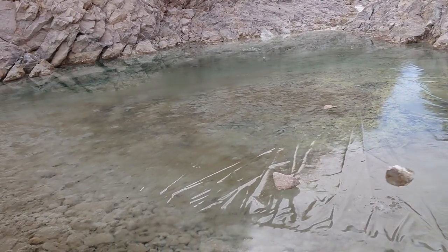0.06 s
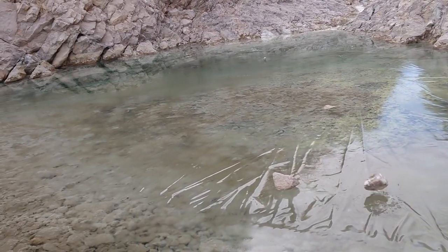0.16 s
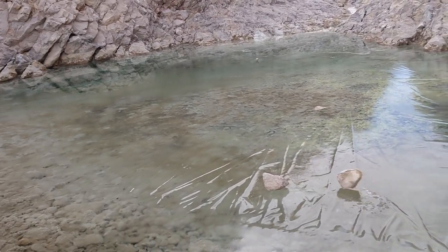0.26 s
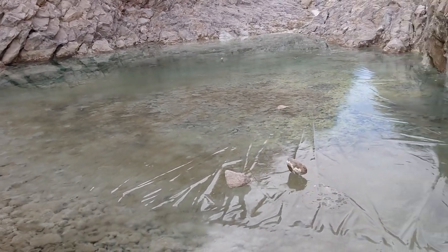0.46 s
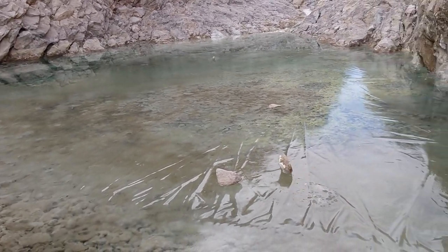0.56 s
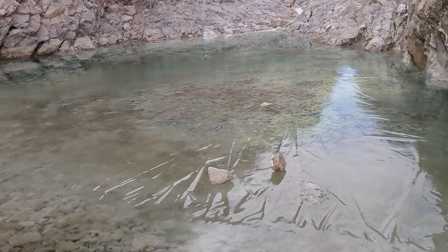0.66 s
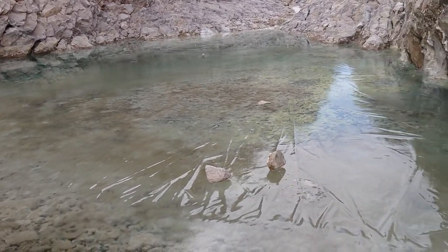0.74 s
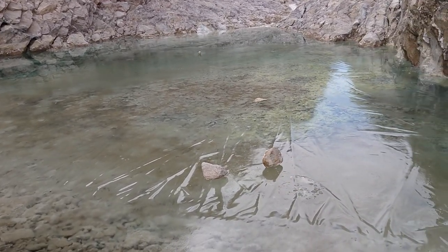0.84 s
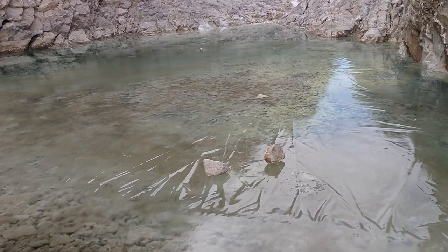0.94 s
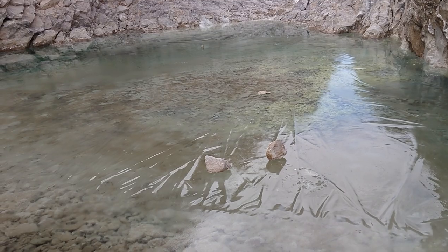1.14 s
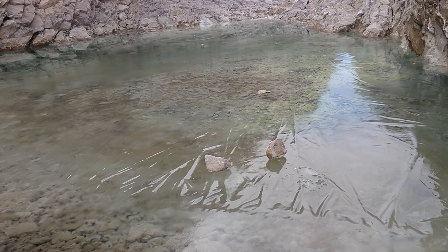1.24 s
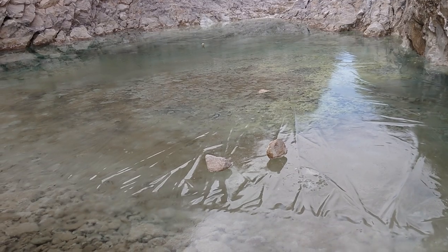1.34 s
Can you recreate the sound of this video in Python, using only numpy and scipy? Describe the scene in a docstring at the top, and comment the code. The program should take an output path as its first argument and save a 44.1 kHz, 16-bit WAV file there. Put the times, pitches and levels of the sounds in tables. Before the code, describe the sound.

A thrown stone strikes thin ice with a sharp crack, then tumbles on with weaker, slightly chirping knocks and a soft slide. Rocks around the pool return a short echo over faint outdoor wind.

```python
"""Faint wind swells, then a thrown stone cracks onto thin ice over a rock pool and tumbles on.
Each contact sends a quick falling chirp through the sheet, and the rock walls answer.
After a few duller knocks the stone slides softly; a few far peeps lie behind.
A small camera with two spaced microphones listens."""
import sys
import numpy as np
from scipy import signal
from scipy.fft import rfft, irfft, next_fast_len
from scipy.io import wavfile

SR = 44100
rng = np.random.default_rng(int(sys.argv[2]) if len(sys.argv) > 2 else 0)


def log_audio(samples):
    """Write samples as a 16-bit WAV file to the path given in sys.argv[1]."""
    # one column per channel
    frames = np.atleast_2d(samples).T
    # limit to full scale, then quantise
    limited = np.clip(frames, -1, 1)
    pcm = np.round(limited * 32767).astype(np.int16)
    wavfile.write(sys.argv[1], SR, pcm)


N = 61739
CRACK_S = 0.2257
THUD_LAG_MS, CHIRP_LAG_MS, ECHO_LAG_MS = 0.029, 0.24, 0.3403

# left-right likeness of ice and rock noise: freq_hz, correlation
POOL_LIKENESS = [(60, 0.78), (300, 1), (700, .55), (2000, 0.14), (6000, 0.49), (14000, 0.11)]


def amp(db):
    return 10 ** (np.asarray(db) / 20)


def unit_rms(x):
    return x / np.sqrt(np.mean(x ** 2) + 1e-20)


def along(points, hz):
    """Interpolate (freq_hz, value) points on a log axis."""
    freqs_hz, values = np.transpose(points)
    return np.interp(np.log(hz + 1), np.log(freqs_hz + 1), values)


def clock(start_s=0):
    return np.arange(N) / SR - start_s


def curves(rows):
    """Per-sample curve for each column after time_s."""
    times_s, *columns = np.transpose(rows)
    return [np.interp(clock(), times_s, column) for column in columns]


def fade(t, t60_s):
    return np.exp(-np.log(1000) * np.maximum(t, 0) / t60_s)


def rise(t, rise_s):
    return 1 - np.exp(-np.maximum(t, 0) / rise_s)


def swell(centre_s, sigma_s):
    return np.exp(-(clock(centre_s) / sigma_s) ** 2 / 2)


def filtered(x, response):
    """Apply a complex response(hz)."""
    size = next_fast_len(N + SR // 4)
    return irfft(rfft(x, size) * response(np.fft.rfftfreq(size, 1 / SR)), size)[..., :N]


def placed(x, lag_ms, pan_db):
    """Spaced microphones: left lags right by lag_ms; pan_db raises left and lowers right."""
    side = np.array([[1], [-1]])
    return amp(side * pan_db) * filtered(x, lambda hz: np.exp(-1j * np.pi * side * hz * lag_ms / 1000))


def noise(colour, likeness=POOL_LIKENESS):
    """Coloured stereo noise, rms 1."""
    def mid_side_gains(hz):
        angle = np.arccos(np.clip(along(likeness, hz), -1, 1)) / 2
        return amp(along(colour, hz)) * [np.cos(angle), np.sin(angle)]
    mid, side = filtered(rng.standard_normal((2, N)), mid_side_gains)
    return unit_rms(np.array([mid + side, mid - side]))


def damped_sines(tones, start_s, rise_s):
    t = np.maximum(clock(start_s), 0)
    sines = sum(amp(db) * np.sin(2 * np.pi * hz * t) * fade(t, t60_s) for hz, db, t60_s in tones)
    return rise(t, rise_s) * sines


def pulse(centre_s, hz):
    """One smooth pressure pulse, spectrum peaking at hz."""
    u = (np.pi * hz * clock(centre_s)) ** 2
    return (2 * u - 1) * np.exp(-np.minimum(u, 50))


def wind():
    """Soft moving air, a hiss that swells before the blow, low buffeting on the microphones."""
    air_levels = [(0, -64, -69), (.09, -63.5, -71), (.14, -63.5, -61), (.22, -61, -60), (.35, -72, -61),
                  (.55, -66, -69.5), (.75, -66.5, -75), (.92, -66.5, -76), (1.12, -63, -70.5),
                  (1.25, -64.5, -70.5), (1.4, -66.5, -77)]  # time_s, air_db, hiss_db
    buffet_levels = [(0, -83), (.11, -65.5), (.4, -94), (.68, -79.5), (.85, -74), (1.02, -73),
                     (1.11, -58.5), (1.17, -88), (1.4, -69.5)]  # time_s, level_db
    # spectra: freq_hz, density_db
    air_colour = [(25, 6), (60, 2), (170, -7.5), (260, -4), (420, 0), (620, -2), (850, 3), (1150, -1.5),
                  (1700, -0.5), (2800, -10.5), (5500, -37.5), (7900, -39), (10300, -13.5), (15500, -27.5)]
    hiss_colour = [(200, -20), (1000, -2.5), (2200, 1.5), (4000, 5), (5800, -0.5), (10500, -13.5),
                   (15500, -8)]
    buffet_colour = [(20, -18), (45, 5), (72, -3), (120, -30.5), (350, -23), (700, -28), (3000, -100)]
    likeness = [(40, 0.28), (200, 0.74), (600, 0.31), (2000, 0.18), (8000, 0.041)]  # left to right: freq_hz, correlation
    air_db, hiss_db = curves(air_levels)
    buffet_db, = curves(buffet_levels)
    air = placed(amp(air_db) * noise(air_colour, likeness), lag_ms=-0.45, pan_db=1.53)
    hiss = amp(hiss_db) * noise(hiss_colour, likeness)
    buffet = amp(buffet_db) * noise(buffet_colour, likeness)
    return air + hiss + buffet


def crack():
    """First blow: the stone grazes and bites; the ice splinters, thuds and rocks on the water."""
    # damped sines: pitch_hz, level_db, t60_s
    snap_modes = [(1480, -22, 0.017), (1810, -8, 0.021), (3390, -15, .016), (4340, -8, 0.011),
                  (5250, -27, 0.021)]
    sheet_modes = [(129.6, -35, 0.073), (163.5, -34.5, 0.041), (252, -35.5, 0.052), (394, -41, 0.071)]
    tail_tones = [(1502, -3, .3), (1710, 0, .25), (1905, -3, .25), (2450, -5, .25), (2600, -4, .18),
                  (2790, -6, .18), (2915, -5, .18), (3330, -2, .14), (5330, -6, .11), (5835, -7, .11)]  # faint narrow tones colouring the crack's echo
    # spectra: freq_hz, density_db
    splinter_colour = [(100, -14), (280, 0.5), (500, -17), (950, 2), (1400, -5), (1780, -2), (2200, -12),
                       (2600, 2), (3350, -3.5), (3900, -6.5), (5500, -3), (10000, -9), (12000, -7.5),
                       (15000, -7.5)]
    echo_colour = [(40, -15), (120, -3.5), (250, -8), (550, -6.5), (1000, -5.5), (1650, 2), (2700, -2),
                   (3800, -0.5), (5500, -6.5), (10500, -12), (15500, -16)]
    graze_lead_s, thud_lead_s, bite_delay_s = 0.0025, 0.0015, 0.00027
    splinter_rise_s, splinter_hold_s = 0.00032, 0.0045
    t = clock(CRACK_S)
    graze = amp(-41) * rise(t + graze_lead_s, splinter_rise_s)
    force = graze + amp(-28) * rise(t, splinter_rise_s)
    splinters = noise(splinter_colour) * force * fade(t - splinter_hold_s, t60_s=0.013)
    spike = amp(-12) * pulse(CRACK_S + bite_delay_s, hz=3800)
    split = amp(-24) * pulse(CRACK_S + bite_delay_s, hz=13000)
    snap = amp(-14) * damped_sines(snap_modes, CRACK_S, rise_s=0.0001) - spike - split
    tones = amp(-38.5) * damped_sines(tail_tones, CRACK_S, rise_s=0.001)
    thud = damped_sines(sheet_modes, CRACK_S - thud_lead_s, rise_s=0.001)
    heave = damped_sines([(60, -39, 0.16)], CRACK_S, rise_s=0.023)
    return (placed(splinters, ECHO_LAG_MS, pan_db=-0.8)
            + placed(snap, lag_ms=0.383, pan_db=2)
            + placed(tones, CHIRP_LAG_MS, pan_db=1.3)
            + placed(thud + heave, THUD_LAG_MS, pan_db=0)
            + basin(CRACK_S, echo_colour, tail_db=-35.5, scatter_db=-27, pan_db=-0.13))


def basin(start_s, colour, tail_db, scatter_db, pan_db):
    """The rocks return a blow: dense near scatter, then a tail whose treble dies first."""
    decay_times = [(100, 0.51), (500, 0.58), (1500, 0.34), (4000, 0.4), (12000, 0.4)]  # freq_hz, t60_s
    hz, t, spectrum = signal.stft(noise(colour), SR, nperseg=256)
    tail = amp(tail_db) * fade(t - start_s, along(decay_times, hz)[:, None])
    scatter = amp(scatter_db) * fade(t - start_s, t60_s=0.07) / 2
    echo = signal.istft(spectrum * (tail + scatter), SR, nperseg=256)[1][:, :N]
    return placed(echo * rise(clock(start_s), rise_s=0.001), ECHO_LAG_MS, pan_db)


def chirp(contact_s):
    """High bending waves outrun low ones in the sheet, so the pitch falls."""
    centre_hz, fall_s, lead_s, width_s = 1900, 0.0028, 0.0006, 0.00075
    t = np.clip(clock(contact_s - lead_s), -0.01, 0.01)
    cycles = centre_hz * fall_s * (1 - np.exp(-t / fall_s))
    return -np.cos(2 * np.pi * cycles) * np.exp(-(t / width_s) ** 2)


def knocks():
    """Each contact pushes the ice and sets off a chirp; the nearest wall repeats both."""
    contacts = [(0.2261, -27.5, 444, -20, -51.5), (0.3079, -47, 1080, -52, -59),
                (0.326, -42.5, 417, -69, -66), (0.3652, -36.5, 560, -40, -58.5),
                (0.3916, -27.5, 810, -34, -46), (0.4627, -48, 490, -48, -69.5),
                (.4875, -53, 566, -49.5, -85), (.5438, -45.5, 438, -66, -68),
                (.978, -56.5, 400, -69, -75.5)]  # start_s, push_db, push_hz, chirp_db, echo_db
    patch_modes = [(1300, -27, .02), (2040, -11, 0.019), (2410, -31, 0.016), (3400, -24, 0.045)]  # ice under the stone: pitch_hz, level_db, t60_s
    echo_colour = [(50, -20), (130, -4), (300, -9.5), (550, -2.5), (1100, 1.5), (1800, 0), (2600, -4.5),
                   (3600, -9), (5000, -20), (10500, -23), (15500, -29)]  # freq_hz, density_db
    wall_delay_s, wall_cutoff_hz = 0.0084, 2500
    pushes, chirps, echoes = np.zeros(N), np.zeros(N), np.zeros((2, N))
    for start_s, push_db, push_hz, chirp_db, echo_db in contacts:
        thump = amp(-23) * pulse(start_s, hz=165)
        pushes += amp(push_db) * (pulse(start_s, push_hz) + thump)
        tick = amp(-9) * pulse(start_s, hz=2700)
        patch = damped_sines(patch_modes, start_s, rise_s=0.0001)
        chirps += amp(chirp_db) * (chirp(start_s) + tick + patch)
        echoes += basin(start_s, echo_colour, echo_db, scatter_db=echo_db + 9.5, pan_db=0.2)
    direct = placed(pushes, THUD_LAG_MS, pan_db=-0.4) + placed(chirps, CHIRP_LAG_MS, pan_db=4.7)
    wall = lambda hz: np.exp(-2j * np.pi * hz * wall_delay_s) / (1 + 1j * hz / wall_cutoff_hz)
    return direct + amp(-12) * filtered(direct, wall) + echoes


def far_wall():
    """The crack returns late, bright and blurred from the far rock face."""
    colour = [(300, -8), (1200, -12), (2200, -1), (3500, 0), (6000, 10), (10500, -5), (15500, -24)]  # freq_hz, density_db
    return amp(-49) * swell(CRACK_S + 0.085, sigma_s=0.0052) * noise(colour)


def peeps():
    """Short, blurred peeps far off to the left."""
    events = [(0.659, 0.008, 1430, 203, -64.5), (0.77, 0.019, 1760, 132, -65.5),
              (1.038, 0.0072, 1465, 45, -61), (1.316, 0.0071, 1520, 220, -63.5)]  # centre_s, sigma_s, pitch_hz, half_width_hz, level_db
    out = np.zeros((2, N))
    for centre_s, sigma_s, pitch_hz, half_width_hz, level_db in events:
        peak = lambda hz: 1 / (1 + ((hz - pitch_hz) / half_width_hz) ** 2)
        band = unit_rms(filtered(rng.standard_normal((2, N)), peak))
        out += amp(level_db) * band * swell(centre_s, sigma_s)
    return placed(out, lag_ms=-0.45, pan_db=3)


def slide():
    """After its last knock the stone slides and the sheet rumbles faintly."""
    levels = [(.9, -98), (.98, -81), (1.1, -72.5), (1.24, -76.5), (1.4, -79.5)]  # time_s, level_db
    colour = [(80, -19), (180, -13.5), (260, 2), (390, 7.5), (520, -3), (1200, -27), (4000, -57)]  # freq_hz, density_db
    level_db, = curves(levels)
    return amp(level_db) * noise(colour)


def scene():
    return crack() + far_wall() + knocks() + slide() + wind() + peeps()


def record(dry):
    """The microphones dip in the treble; the camera cuts deep bass and all above its band limit."""
    microphone = [(5900, -1.5), (6500, -6.5), (7100, -11.5), (7500, -14.5), (8100, -6), (8600, -9),
                  (9000, -18.5), (9600, 1)]  # response: freq_hz, gain_db
    low_cut_hz, top_hz = 65, 16000
    low_cut = lambda hz: (1j * hz) ** 2 / (low_cut_hz ** 2 - hz ** 2 + 1j * hz * low_cut_hz)
    return filtered(dry, lambda hz: amp(along(microphone, hz)) * low_cut(hz) * (hz < top_hz))


dry = scene()
out = record(dry)
log_audio(out)
```